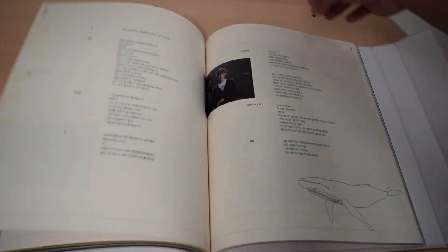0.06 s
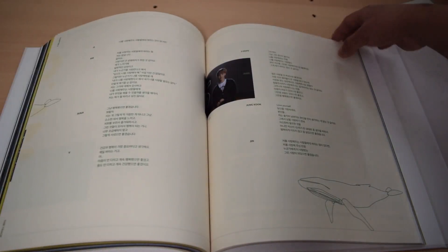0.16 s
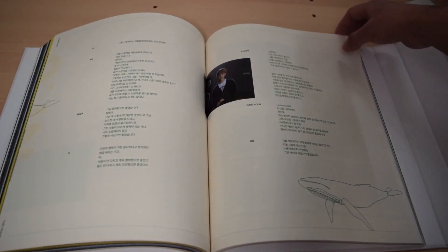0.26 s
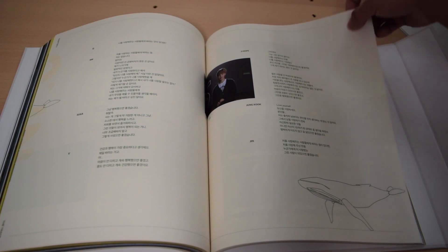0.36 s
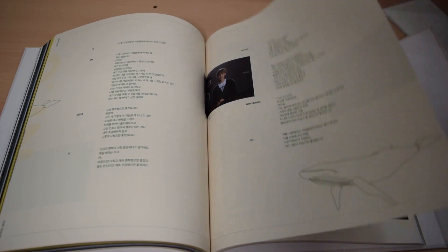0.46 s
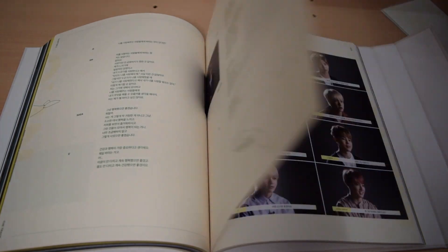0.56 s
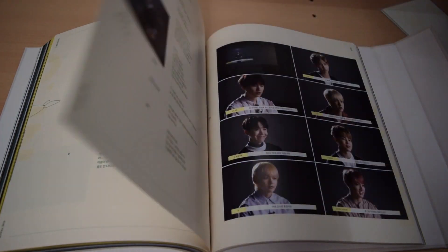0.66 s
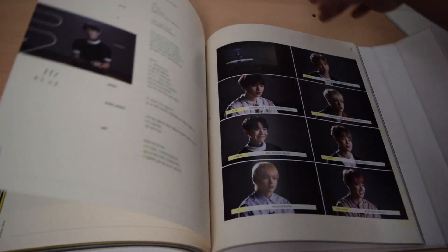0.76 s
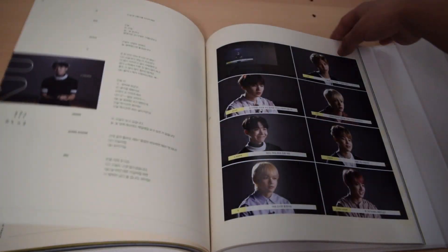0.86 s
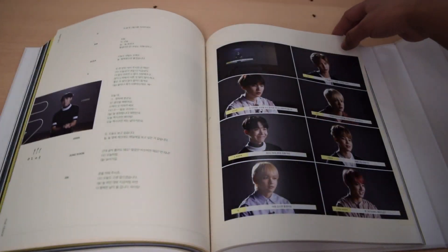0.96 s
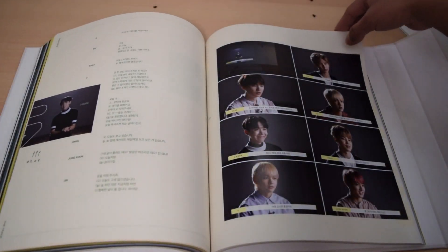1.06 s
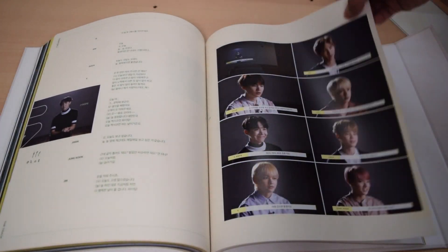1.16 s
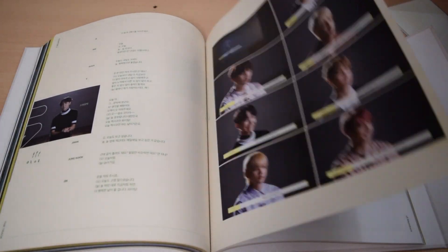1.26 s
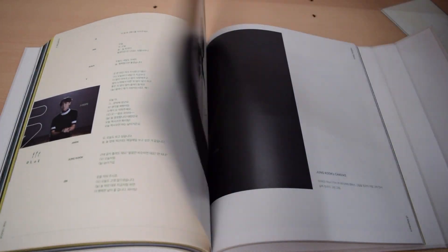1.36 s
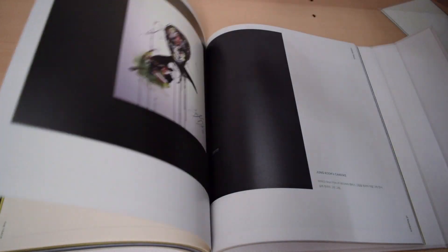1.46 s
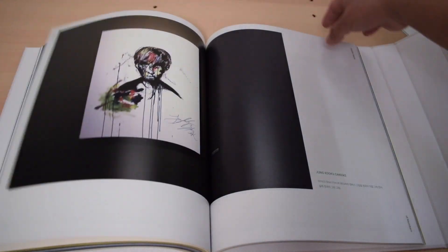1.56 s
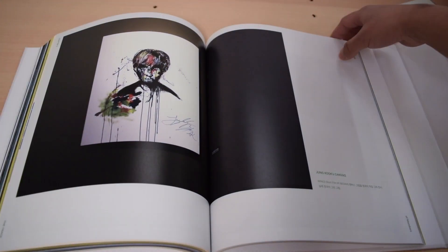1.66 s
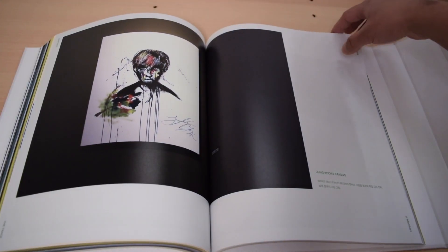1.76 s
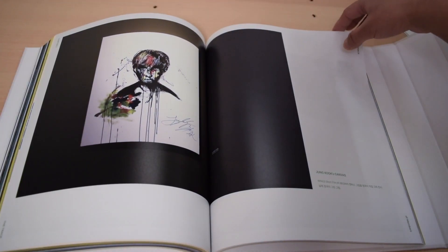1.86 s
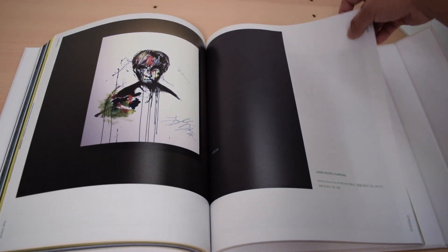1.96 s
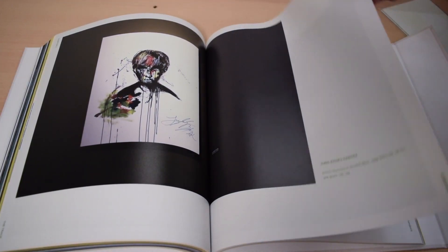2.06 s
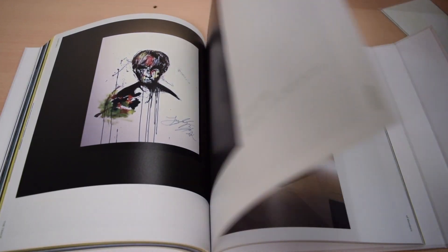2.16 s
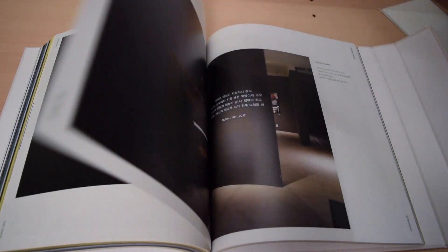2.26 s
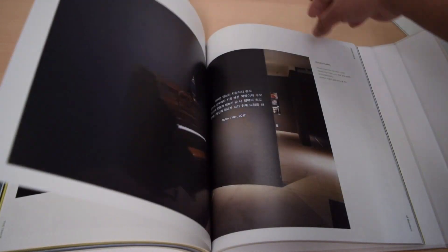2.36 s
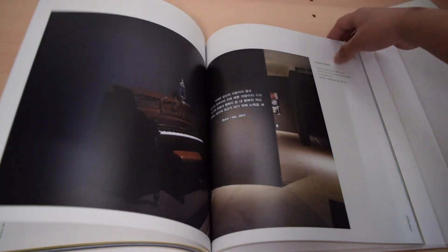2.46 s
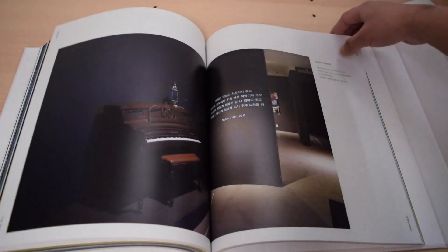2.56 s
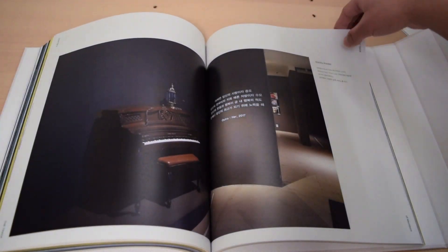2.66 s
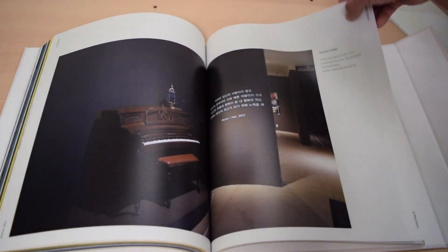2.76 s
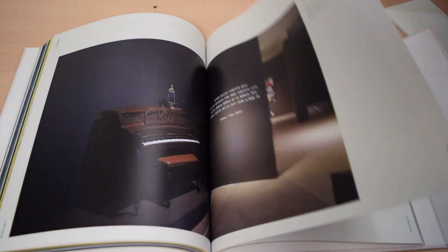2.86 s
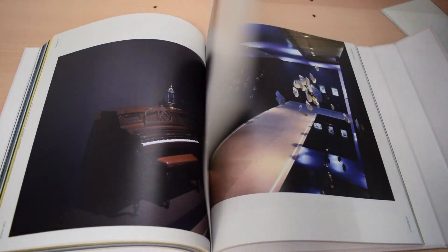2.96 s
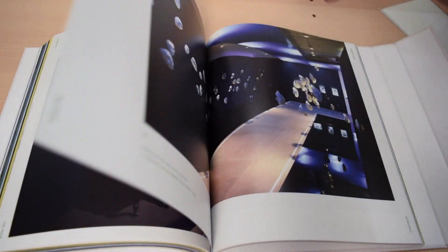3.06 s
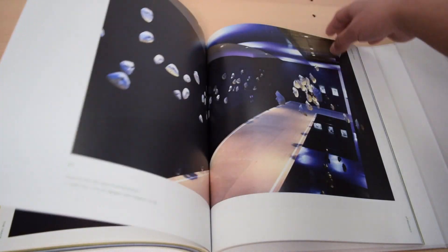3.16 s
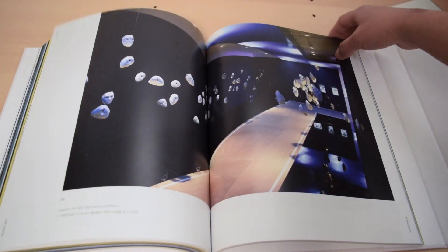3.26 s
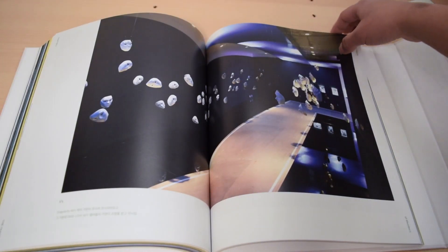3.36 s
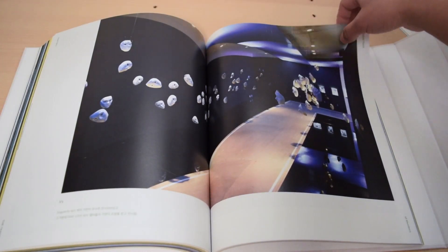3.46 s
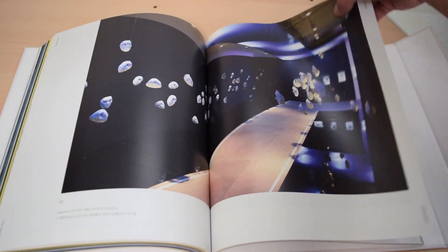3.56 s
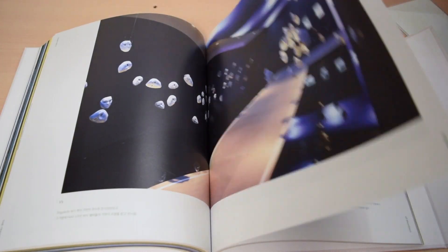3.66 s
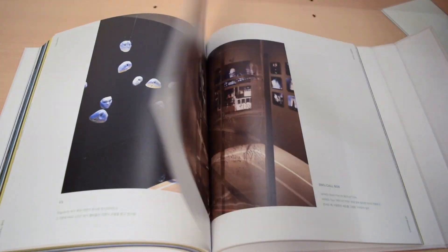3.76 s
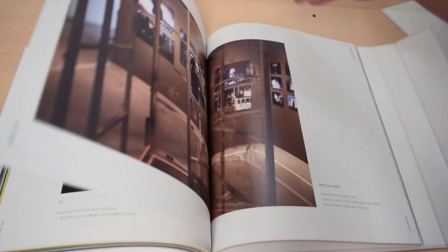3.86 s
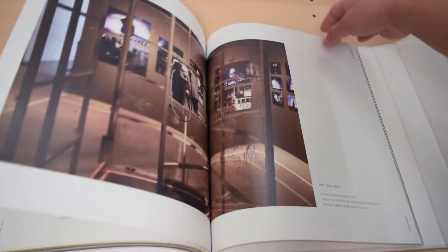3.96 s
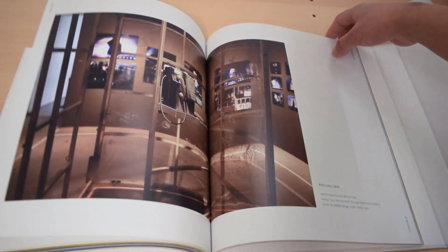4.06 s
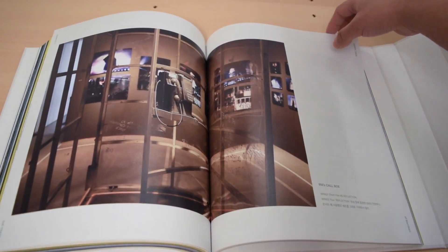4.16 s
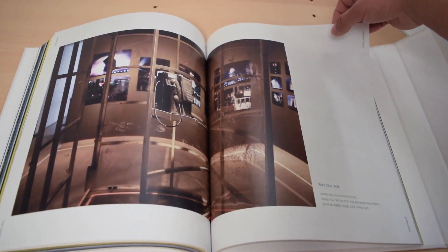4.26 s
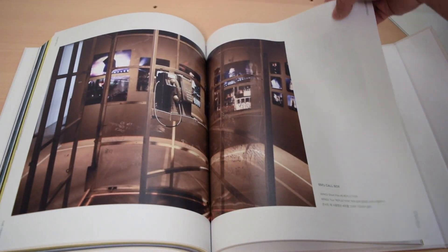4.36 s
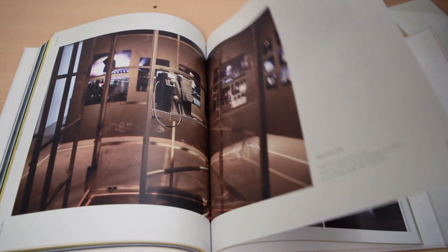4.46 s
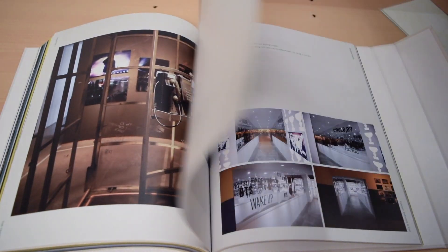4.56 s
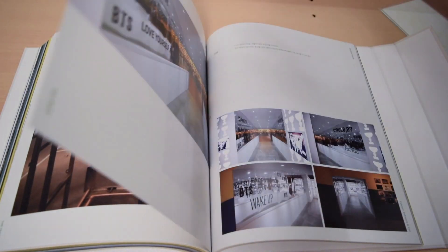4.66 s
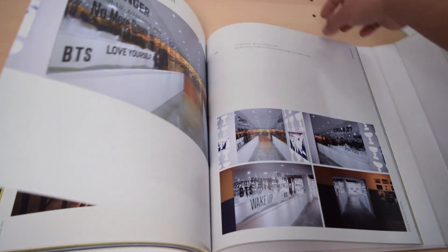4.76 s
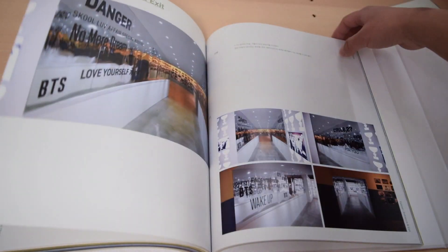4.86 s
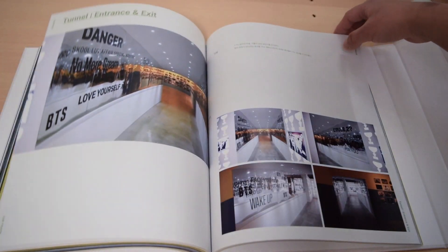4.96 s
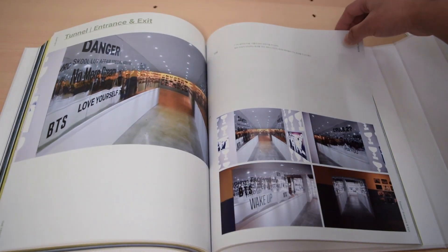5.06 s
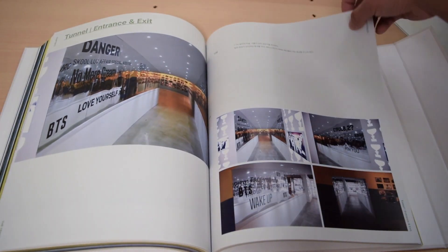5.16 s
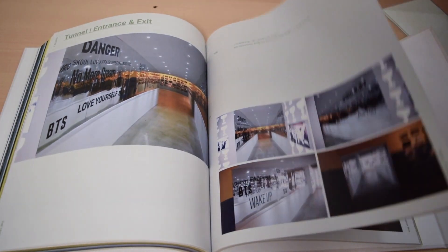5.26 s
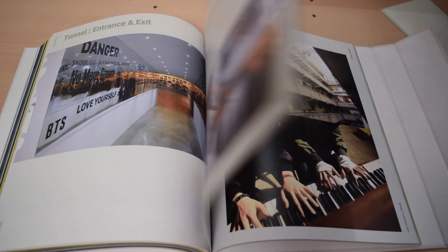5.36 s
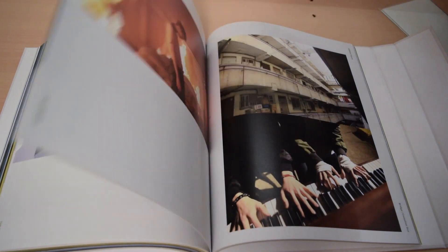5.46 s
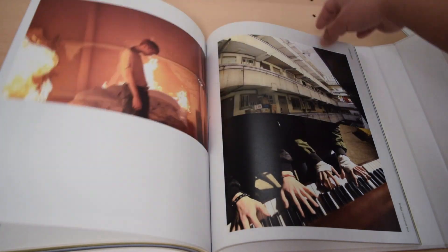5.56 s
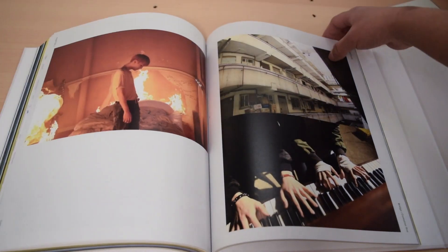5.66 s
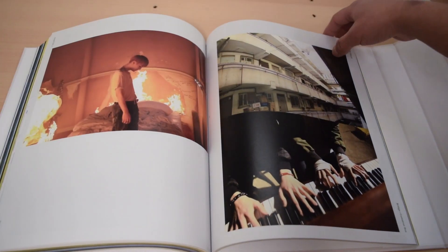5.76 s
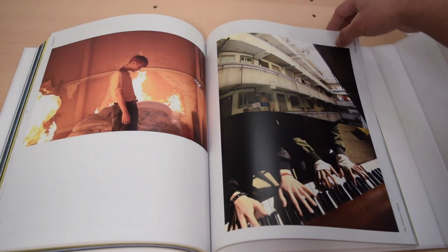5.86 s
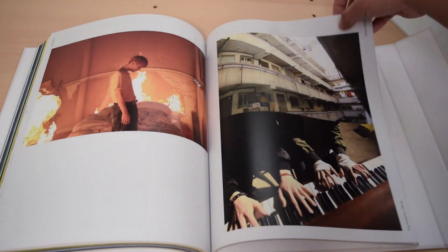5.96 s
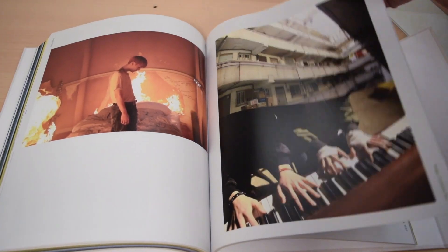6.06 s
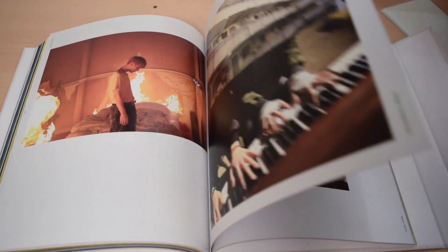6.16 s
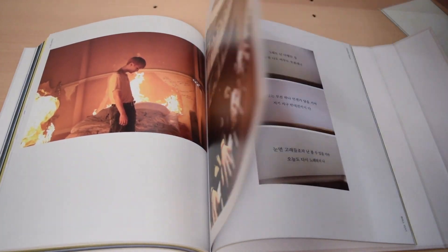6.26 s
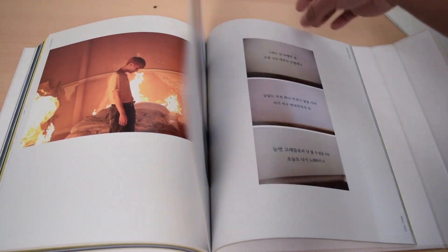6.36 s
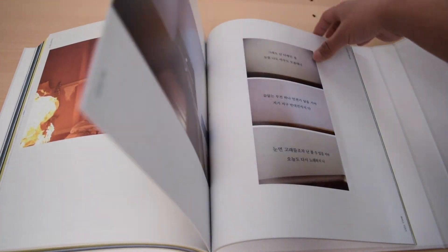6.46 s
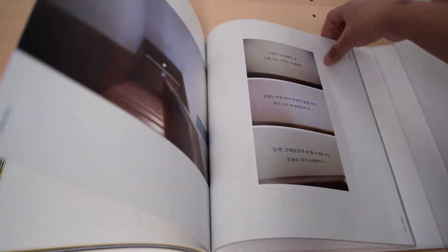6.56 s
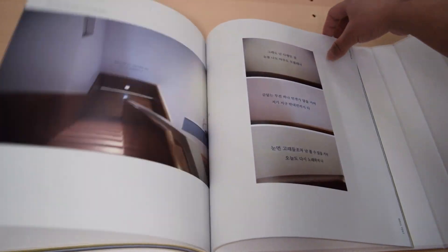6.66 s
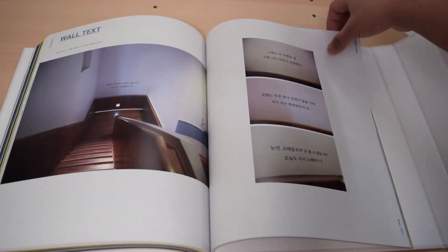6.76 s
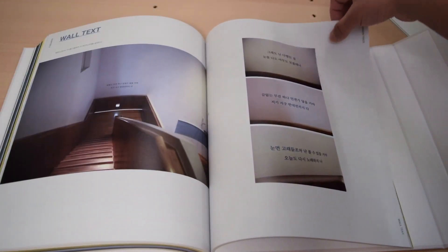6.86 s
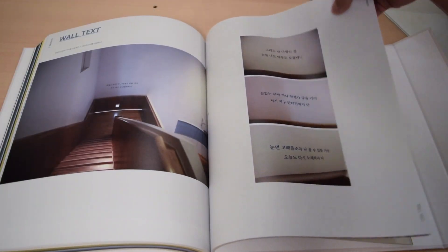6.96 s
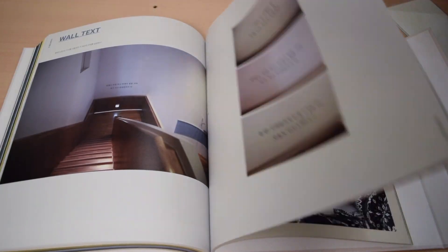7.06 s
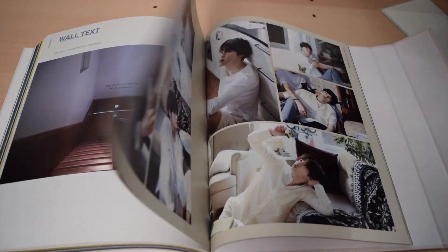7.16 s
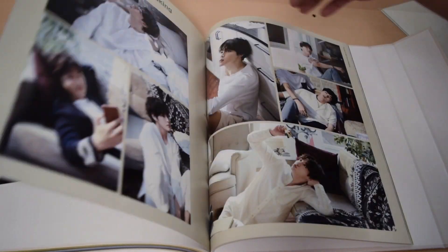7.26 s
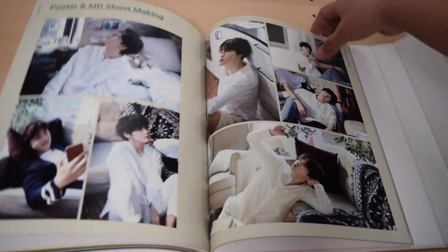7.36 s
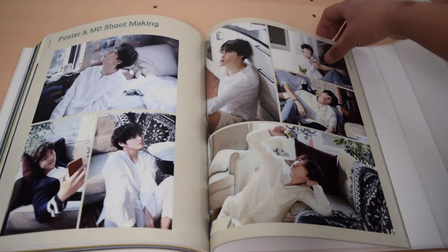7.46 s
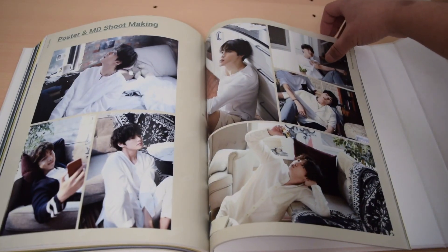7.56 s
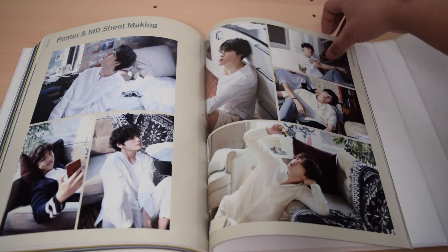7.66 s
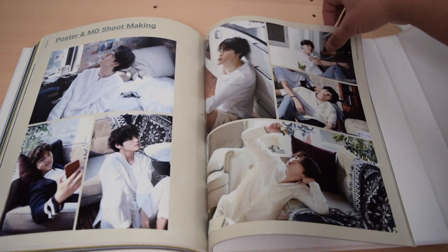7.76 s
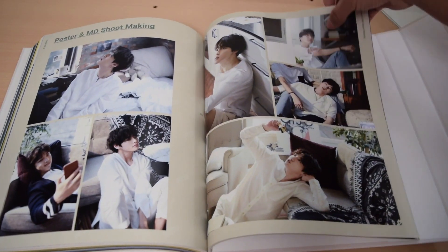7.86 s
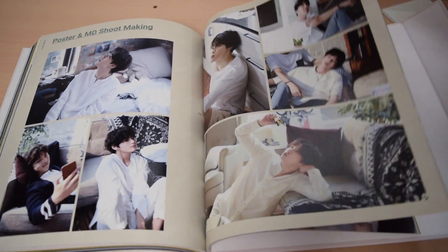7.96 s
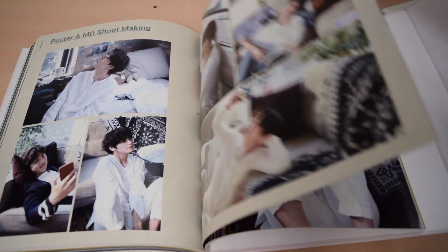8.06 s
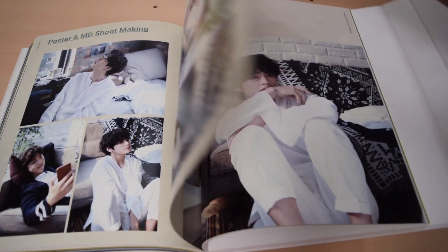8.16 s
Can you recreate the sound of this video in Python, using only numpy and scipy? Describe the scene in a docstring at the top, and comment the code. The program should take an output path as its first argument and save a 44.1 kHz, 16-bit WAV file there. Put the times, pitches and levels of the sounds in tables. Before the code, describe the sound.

Thick pages of a large book turn one after another, each with a crinkling paper swish and a light snap.

```python
"""Turning the pages of a large book.

A hand turns thick glossy pages on a table in a small room, close to the microphone. In each turn the
fingers drag the crinkling sheet over the one below and tug it up: stick-slip friction. Its edge peels
off and snaps free, and it buckles with a hollow flutter as it swings over. Then the fingers land
softly and brush over the next page."""
import sys
import numpy as np
from scipy import signal
from scipy.fft import rfft, irfft
from scipy.io import wavfile
from scipy.ndimage import uniform_filter1d

SR = 44100
rng = np.random.default_rng(int(sys.argv[2]) if len(sys.argv) > 2 else 0)


def generate_wav(signal):
    """Clip the signal to [-1, 1] and save it as 16-bit WAV at the path in sys.argv[1]."""
    frames = np.transpose(np.atleast_2d(signal))
    scaled = np.clip(frames, -1, 1) * 32767
    pcm = np.round(scaled).astype(np.int16)
    wavfile.write(sys.argv[1], SR, pcm)


N = 362502
HZ = np.fft.rfftfreq(2048, 1 / SR)

# Still air of the room. Each row: frequency in Hz, relative level in dB.
AIR_SPECTRUM = [(15, -47), (25, -9.5), (166, -4), (344, -6.5), (405, -6.5), (489, -8.5), (754, -8),
                (1040, -12.5), (1370, -12), (1740, -13.5), (2350, -16.5), (2910, -17.5), (4140, -20.5),
                (12900, -30.5), (16000, -36)]
# Room decay. Each row: frequency in Hz, T60 in seconds.
ROOM_T60 = [(100, 0.23), (500, 0.23), (2000, .24), (5000, 0.23), (9000, 0.16), (15000, 0.3)]
# Resonances of the open book. Each row: centre in Hz, width in Hz, gain in dB.
BOOK_MODES = [(288, 70, 5), (429, 20, 3), (610, 32.6, 1), (987, 31, -0.5), (1210, 50, 0.5),
              (1600, 130, 1.5), (1860, 42, 0), (2800, 70, 0.5), (3975, 110, 0.5), (6630, 600, 2)]
# Rasp of rubbed paper. Each row: frequency in Hz, relative level in dB.
RASP_SPECTRUM = [(100, -19), (400, 0.5), (1000, 0), (2200, 5), (3200, 1), (5500, -1.5), (7200, -9.5),
                 (9000, -13.5), (16000, -28.5)]
# Fizz of a fast thin edge. Each row: frequency in Hz, relative level in dB.
FIZZ_SPECTRUM = [(3000, -50), (6000, -13), (7300, 5), (8600, 7.5), (10200, 8.5), (13000, 4), (16000, -3.5)]
# Radiation of the buckling sheet. Each row: frequency in Hz, relative level in dB.
SHEET_SPECTRUM = [(40, -43), (120, -19), (230, -14), (320, -9.5), (420, 0), (800, -3), (1500, -3),
                  (3000, -6)]
# Knock of the sheet in a snap. Each row: frequency in Hz, relative level in dB.
KNOCK_SPECTRUM = [(60, -39), (150, -24), (260, -10), (520, 0.5), (2100, 2), (2800, -10), (5000, -53)]
# Crack of the edge in a snap. Each row: frequency in Hz, relative level in dB.
CRACK_SPECTRUM = [(1200, -30), (2200, -18.5), (2900, -1), (4200, 2), (5600, 1.5), (7200, 3.5), (11000, 2.5),
                  (16000, -4.5)]
# Fingers land on the pages. Each row: start in seconds, level in dB, thud pitch in Hz.
FINGER_PATS = [(0.922, -41, 230), (1.669, -39.5, 160), (2.506, -40.5, 120), (3.252, -39.5, 129),
               (4.873, -39.5, 128), (5.674, -39, 175), (6.7933, -34, 196)]
# A fingertip feels for the corner. Each row: start in seconds, length in seconds, level in dB.
FINGER_BRUSHES = [(1.031, .015, -60), (1.793, .012, -53), (1.856, .012, -53), (2.615, .015, -55.5),
                  (3.43, 0.019, -53.5), (4.191, .02, -54.5), (5.675, 0.036, -55), (5.769, .045, -55),
                  (6.552, 0.049, -51.5), (6.659, 0.048, -51), (7.456, .068, -50.3), (7.617, 0.052, -51.5),
                  (7.737, 0.018, -55)]
# Page turns. Each row: drag start and length in seconds, drag level in dB, tug peak time in seconds,
# tug level in dB, peel start and length in seconds, peel level, swell and fizz gain in dB.
PAGE_TURNS = [(0.3504, 0.17, -48, .388, -34, 0.54, .056, -43.5, 0, -1.2),
              (1.1474, 0.14, -50, 1.187, -41.5, 1.33, 0.075, -50.5, 3, 1),
              (1.957, .19, -45.5, 2.007, -34.5, 2.153, 0.069, -51, 9, 3.2),
              (2.7534, 0.19, -47.5, 2.823, -44.5, 2.96, 0.047, -51, 1.5, -3),
              (3.534, 0.14, -46, 3.652, -43, 3.715, 0.051, -40.5, -5.5, -1.2),
              (4.3355, .2, -51, 4.344, -38.5, 4.549, .097, -41, -8.5, -2.5),
              (5.1905, .152, -50, 5.243, -47, 5.3635, 0.054, -43, -5.5, -3),
              (6.0525, 0.099, -51, 6.063, -47, 6.152, .13, -45, -17, -4),
              (6.913, .187, -52.5, 6.994, -39, 7.1052, 0.091, -43.5, -2.5, -2),
              (7.921, .168, -48.5, 8.045, -42.5, 8.0955, 0.047, -40.5, -0.5, -3)]
# The sheet buckles. Each row: start and length in seconds, level and swell in dB,
# cutoff in Hz (higher when bent tighter), ring of the bulge in Hz.
SHEET_BENDS = [(0.0, 0.015, -38, -10.5, 1740, 1710), (0.2226, .024, -48.5, -15, 1985, 750),
               (0.6137, 0.058, -33.6, -11, 2040, 666), (1.1842, 0.025, -40.5, -9.5, 2500, 1630),
               (1.3802, 0.042, -38, 5, 2400, 920), (1.44, 0.034, -27.5, -6.5, 1805, 1220),
               (2.2266, .039, -31.5, -8.1, 2525, 1180), (2.3056, 0.041, -35, -2, 2210, 1780),
               (2.9832, .017, -43, 4, 1595, 980), (3.056, .056, -39.5, -2, 1300, 804),
               (3.1175, 0.042, -32, -12.5, 1840, 855), (3.795, .085, -34.1, -8, 2030, 1120),
               (3.875, .062, -50.5, -0.5, 1750, 607), (4.602, 0.044, -40, -13, 2330, 1280),
               (4.7312, 0.036, -45, -4.5, 1730, 730), (5.414, 0.018, -41.5, -10, 2545, 2370),
               (5.464, 0.034, -35, -14, 1960, 850), (5.5175, 0.042, -42, -12, 1105, 626),
               (6.1512, .018, -41.1, -3, 2300, 1850), (6.1924, 0.021, -30, -14, 1900, 1030),
               (6.3115, .131, -45.3, -6.5, 716, 437), (6.458, 0.045, -44.1, -7, 860, 427),
               (7.1094, .03, -33, -16, 2400, 560), (7.1802, 0.014, -32.1, -10.5, 1890, 1410),
               (7.2532, .029, -48, 13.5, 1780, 1300), (7.292, .064, -44.2, 6.2, 1800, 1150),
               (8.145, 0.022, -22.8, -4, 2600, 980)]
# Sharp snaps and ticks: mostly an edge or kink snapping free, plus a few finger ticks and a pat's click. Each
# row: time in seconds, ring in Hz, knock and crack levels in dB, treble tilt of the crack in dB per octave,
# suddenness from 0 to 1.
SNAPS_AND_TICKS = [(.3626, 860, -47, -38.5, -6.5, 0.4), (.4244, 690, -38, -39.5, -9.5, 0.56),
                   (0.4542, 1940, -36, -46, -6, 0.4), (0.6066, 3720, -33.5, -17.2, -3.5, 0.1),
                   (1.3915, 3280, -39, -23.5, -24, .15), (1.443, 1150, -29, -60, -10, .4),
                   (1.978, 1940, -38.5, -36.5, -6, 0), (2.008, 1900, -38, -32.5, -10, .25),
                   (2.17, 1286, -36, -38, -9, .2), (2.226, 1110, -20, -28.5, -7, 0.62),
                   (2.2301, 2650, -26.5, -29.5, -5.5, 0.1), (2.3082, 1800, -29, -55, -16, .5),
                   (2.3367, 1910, -20.5, -42.5, -28, 0.63), (2.8527, 746, -31, -46, -5, .7),
                   (2.989, 1250, -35.5, -51, -10, 0.1), (3.062, 950, -41, -65, -5, .3),
                   (3.119, 830, -33, -62, -9, 0.4), (3.728, 1030, -38.5, -34.5, -9, .2),
                   (3.785, 1760, -30.5, -29, -7, 0), (4.291, 800, -32.5, -39.8, -11, .2),
                   (4.4236, 730, -37.5, -45.5, -10, 0.54), (4.5571, 1850, -27, -30.5, -5, 0.23),
                   (4.6366, 1280, -31.5, -36.5, -21, 0), (4.873, 570, -42.5, -59, -17, .7),
                   (5.4153, 2820, -36, -36, -16, 0), (5.939, 560, -53, -48, 6, 0.4),
                   (6.196, 990, -24, -56, -4, .5), (6.2424, 1720, -34, -32.5, -5.5, 0.87),
                   (6.819, 1660, -37.5, -49.5, 1, 0.3), (6.876, 2000, -60, -54, -8, .5),
                   (7.0306, 694, -33, -40, -11, 0.53), (7.104, 605, -30.5, -37, -11, 1),
                   (7.115, 563, -25, -33, -19, 0.02), (7.119, 2960, -36, -33.5, -16, 0),
                   (7.348, 1160, -34.5, -66, -6, 0), (7.7184, 820, -42, -50.5, 0, 0),
                   (7.93, 1462, -42, -34.5, 0.5, 0.93), (8.044, 1510, -37, -27.5, -2, 0.94),
                   (8.0884, 600, -44, -34, 4, 0.58), (8.0961, 1240, -32, -25, -5, 0.63),
                   (8.1643, 1240, -16, -16.5, 2.5, 0.97), (8.165, 2900, -22, -19, -24, .9)]

DRAG_FADE_DB_PER_S = 31  # the drag eases as the sheet lifts clear


def gain_of(db):
    """Decibels to amplitude."""
    return 10 ** (np.asarray(db) / 20)


def unit_rms(x):
    """Scales to an rms of one."""
    return x / np.sqrt(np.mean(x ** 2) + 1e-20)


def curve(points, hz=HZ):
    """Interpolates a table over log frequency."""
    f, value = np.transpose(points)
    return np.interp(np.log(hz + 1), np.log(f), value)


def add(mix, start_s, sound):
    """Mixes a sound in at a time."""
    part = mix[max(round(start_s * SR), 0):][:len(sound)]
    part += sound[:len(part)]


def coloured(x, colour_db):
    """Minimum-phase filter; keeps the energy."""
    log_gain = np.log(np.maximum(gain_of(colour_db - colour_db.max()), 1e-5))
    mirrored = np.concatenate([log_gain, log_gain[-2:0:-1]])
    impulse = np.fft.ifft(np.exp(np.conj(signal.hilbert(mirrored)))).real
    y = signal.fftconvolve(x, impulse)
    return y * np.sqrt(np.sum(x ** 2) / (np.sum(y ** 2) + 1e-20))


def resonance_db(hz, width_hz, db):
    """One resonance as a spectral bump."""
    return db / (1 + (2 * (HZ - hz) / width_hz) ** 2)


def book_db():
    """Summed resonances of the open book."""
    return sum(resonance_db(*mode) for mode in BOOK_MODES)


def stroke(length_s, start_db, swell_db, rise_s=0.0049, release_s=0.0048):
    """Force of one movement: quick rise, steady change, short release."""
    t = np.arange(int((length_s + 5 * release_s) * SR)) / SR
    force = gain_of(start_db + np.interp(t, [0, length_s], [0, swell_db]))
    return force * np.minimum(t / rise_s, 1) * np.exp(-np.maximum(t - length_s, 0) / release_s)


def slips(count, per_s, spread_db, bed_gain):
    """Uneven stick-slip clicks over a bed of countless smaller ones."""
    chance, size, bed = rng.random(count), rng.exponential(1, count), rng.standard_normal(count)
    clicks = (chance < per_s / SR) * np.sign(bed) * gain_of(spread_db * np.minimum(size, 3))
    return unit_rms(unit_rms(clicks) + bed_gain * bed)


def contact(count, depth_db, window_samples):
    """Gain of a contact that comes and goes within milliseconds."""
    return gain_of(depth_db * unit_rms(uniform_filter1d(rng.standard_normal(count), window_samples)))


def air(level_db=-56.5):
    """Steady soft room noise."""
    colour = gain_of(curve(AIR_SPECTRUM, np.fft.rfftfreq(N, 1 / SR)))
    return gain_of(level_db) * unit_rms(irfft(rfft(rng.standard_normal(N)) * colour, N))


def room(x, first_s=0.0018, build_s=0.0089):
    """Near-wall reflections thicken into a short tail; each band decays at its own rate."""
    hz, t, noise = signal.stft(rng.standard_normal(SR // 2), SR, nperseg=256)
    decay = gain_of(-60 * t / curve(ROOM_T60, hz)[:, None])
    tail = signal.istft(noise * decay, SR, nperseg=256)[1]
    tail *= np.clip((np.arange(len(tail)) / SR - first_s) / build_s, 0, 1)
    return signal.fftconvolve(x, tail / np.linalg.norm(tail))[:N]


def moving_reflections(x, tails=3, crossfade_hz=3.1):
    """The sheet moves as it sounds, so its reflections keep changing."""
    phase = 2 * np.pi * crossfade_hz * np.arange(N) / SR
    return np.sqrt(2 / tails) * sum(room(x * np.cos(phase + np.pi * k / tails)) for k in range(tails))


def rubbing(force, fizz_db, rasp_db=-2, catch_db=-9):
    """Dense fine slips and a few coarse catches rasp; a fast thin edge adds fizz."""
    count = len(force)
    grip = contact(count, depth_db=3, window_samples=300)
    fine = unit_rms(grip * slips(count, per_s=1500, spread_db=4, bed_gain=1.33))
    catches = gain_of(catch_db) * slips(count, per_s=130, spread_db=4.5, bed_gain=0)
    friction = force * (fine + catches)
    rasp = coloured(friction, curve(RASP_SPECTRUM) + book_db())
    brightness = (force / force.max()) ** 0.54  # harder rubbing is brighter
    fizz = gain_of(-2) * coloured(friction * brightness, curve(FIZZ_SPECTRUM))
    return gain_of(rasp_db) * rasp + gain_of(fizz_db) * fizz


def patting(thud_db=-1, skin_db=-7, skin_s=0.013, skin_hz=900, paper_db=-14, paper_s=0.0075):
    """A fingertip pushes the cushion of pages: one-cycle thud, dull tap of skin, tick of paper."""
    out, t = np.zeros(N), np.arange(4096) / SR
    skin_lowpass_db = -10 * np.log10(1 + (HZ / skin_hz) ** 3)
    for start_s, db, hz in FINGER_PATS:
        thud = np.exp(-hz * t) * np.sin(2 * np.pi * hz * t)
        tap = np.exp(-t / skin_s) * rng.standard_normal(len(t))
        add(out, start_s, gain_of(db + thud_db) * thud)
        add(out, start_s, gain_of(db + skin_db) * coloured(tap, skin_lowpass_db))
        add(out, start_s, rubbing(gain_of(db + paper_db) * np.exp(-t / paper_s), fizz_db=-9))
    return out


def sliding(tug_rise_s=0.01, tug_fall_s=0.011):
    """Each page rubs over the next with one tug, then its edge peels off."""
    out = np.zeros(N)
    for start_s, length_s, drag_db, tug_s, tug_db, *peel in PAGE_TURNS:
        drag = stroke(length_s, drag_db, -DRAG_FADE_DB_PER_S * length_s)
        t = start_s - tug_s + np.arange(len(drag)) / SR
        tug = gain_of(tug_db) * np.exp(np.minimum(t / tug_rise_s, -t / tug_fall_s))
        add(out, start_s, rubbing(np.hypot(drag, tug), fizz_db=-6.5))  # broad contact: duller
        peel_s, peel_length_s, peel_db, swell_db, fizz_db = peel
        add(out, peel_s, rubbing(stroke(peel_length_s, peel_db, swell_db), fizz_db))
    return out


def brushing(dulling_db_per_s=190):
    """A fingertip rubs the page between turns: a flick fizzes, a long stroke is duller."""
    out = np.zeros(N)
    for start_s, length_s, db in FINGER_BRUSHES:
        force = stroke(length_s, db, swell_db=0, rise_s=0.26 * length_s)
        fizz_db = -0.5 - dulling_db_per_s * length_s
        add(out, start_s, rubbing(force, fizz_db, rasp_db=-4.5, catch_db=-6.5))
    return out


def buckling(trim_db=-0.8, leak_db=-36):
    """Small buckles run through the stiff sheet; it radiates little above a cutoff set by curvature."""
    out = np.zeros(N)
    for start_s, length_s, db, swell_db, cutoff_hz, bulge_hz in SHEET_BENDS:
        force = stroke(length_s, db, swell_db, rise_s=0.0009, release_s=0.0035)
        flutter = contact(len(force), depth_db=1.5, window_samples=350)
        buckles = force * unit_rms(flutter * slips(len(force), per_s=1500, spread_db=1.5, bed_gain=0.78))
        ratio = HZ / cutoff_hz
        leak = gain_of(leak_db) ** 2 / (1 + (ratio / 2) ** 4)
        lowpass_db = 10 * np.log10(1 / (1 + ratio ** 13.7) + leak)
        bulge_db = resonance_db(bulge_hz, 0.33 * bulge_hz, db=5)
        add(out, start_s, coloured(buckles, curve(SHEET_SPECTRUM) + book_db() + lowpass_db + bulge_db))
    return gain_of(trim_db) * out


def crinkles(per_s=18, low_hz=600, high_hz=2220, spread_db=2, tilt_db_per_octave=-11, suddenness=0.53):
    """Small kinks give way at random during each drag and fade with it. Rows as in SNAPS_AND_TICKS."""
    rows = []
    for start_s, length_s, drag_db, *_ in PAGE_TURNS:
        for k, (jitter, pitch, knock, crack) in enumerate(rng.random((12, 4))):
            delay_s = (k + jitter) / per_s
            if delay_s < length_s:
                db = drag_db - DRAG_FADE_DB_PER_S * delay_s
                ring_hz = low_hz * (high_hz / low_hz) ** pitch
                knock_db = db + 5 + spread_db * (2 * knock - 1)
                crack_db = db - 0.5 + spread_db * (2 * crack - 1)
                rows.append((start_s + delay_s, ring_hz, knock_db, crack_db, tilt_db_per_octave, suddenness))
    return rows


def snapping(slowest_decay_s=0.0023, tilt_from_hz=3200):
    """A cluster of slips, milliseconds long, cracks and knocks: an edge snaps free, or a finger ticks on the
    paper."""
    out, t = np.zeros(N), np.arange(-3 * slowest_decay_s, 3 * slowest_decay_s, 1 / SR)
    octaves = np.log2(np.maximum(HZ / tilt_from_hz, 1))
    for time_s, ring_hz, knock_db, crack_db, tilt_db_per_octave, suddenness in SNAPS_AND_TICKS + crinkles():
        decay_s = slowest_decay_s * (1 - 0.34 * suddenness)
        rise_s = decay_s * max(1 - suddenness, 0.03)
        envelope = np.exp(np.minimum(t / rise_s, -t / decay_s))
        burst = envelope * slips(len(t), per_s=4500, spread_db=3, bed_gain=0.25)
        burst[len(t) // 2] += 1.2 * suddenness ** 3 * np.linalg.norm(burst)  # one large slip
        burst *= np.sqrt(decay_s * SR / np.sum(burst ** 2))
        body_db = book_db() + resonance_db(ring_hz, 0.53 * ring_hz, db=10)
        knock = coloured(burst, curve(KNOCK_SPECTRUM) + body_db)
        crack = coloured(burst, curve(CRACK_SPECTRUM) + body_db / 2 + tilt_db_per_octave * octaves)
        add(out, time_s + t[0], gain_of(knock_db) * knock + gain_of(crack_db) * crack)
    return out


def scene():
    """Paper and finger sounds, direct and reflected, over the room's air. Mono."""
    sources = [sliding() + brushing(), buckling(), snapping(), patting()]
    room_sends_db = [-5, -4, -6.2, -8]
    send = sum(gain_of(db) * source for db, source in zip(room_sends_db, sources))
    return (sum(sources) + moving_reflections(send) + air())[None]


def record(dry, low_cut_hz=48, high_cut_hz=16100):
    """The microphone loses the deepest bass; a steep low-pass limits the band."""
    highpass = signal.butter(2, low_cut_hz, "highpass", fs=SR, output="sos")
    lowpass = signal.firwin(511, high_cut_hz, window=("kaiser", 9), fs=SR)
    return signal.oaconvolve(signal.sosfilt(highpass, dry), lowpass[None], "same")


dry = scene()
out = record(dry)
generate_wav(out)
```